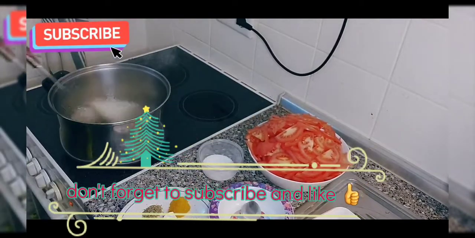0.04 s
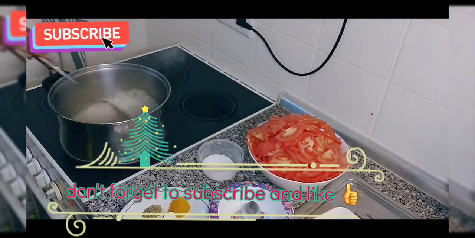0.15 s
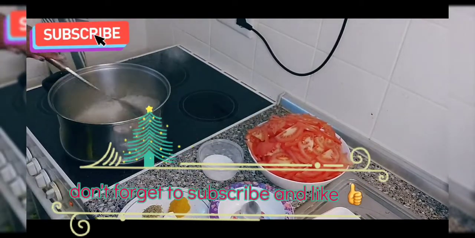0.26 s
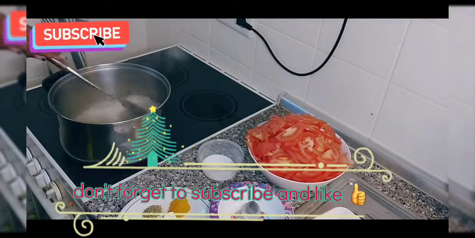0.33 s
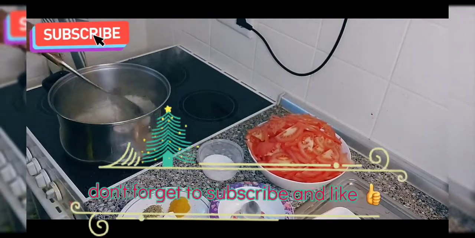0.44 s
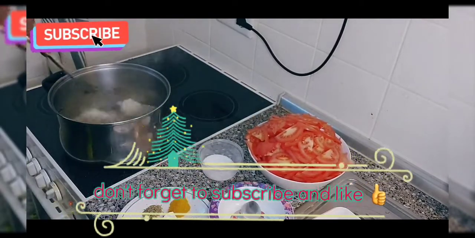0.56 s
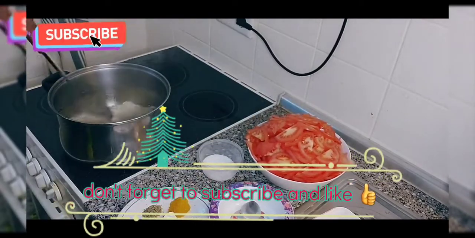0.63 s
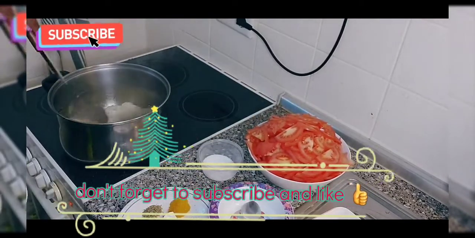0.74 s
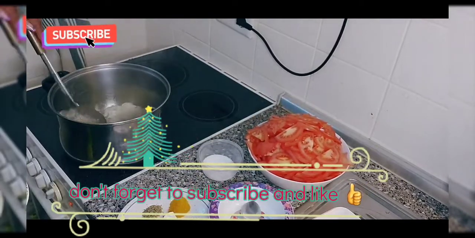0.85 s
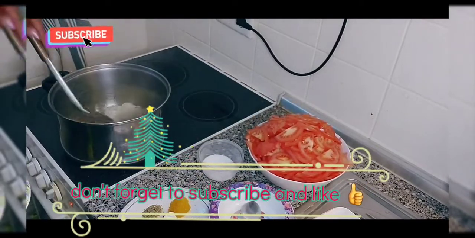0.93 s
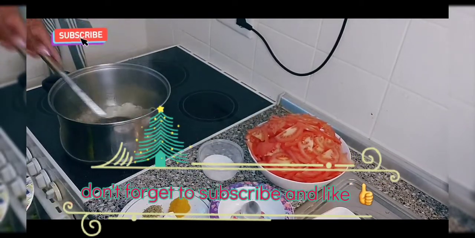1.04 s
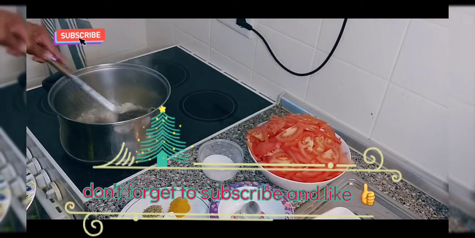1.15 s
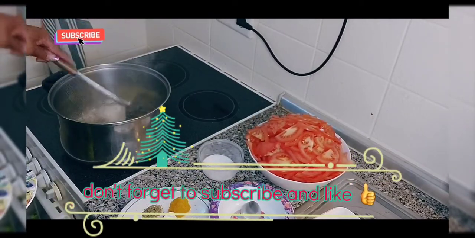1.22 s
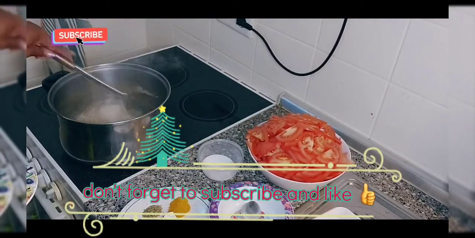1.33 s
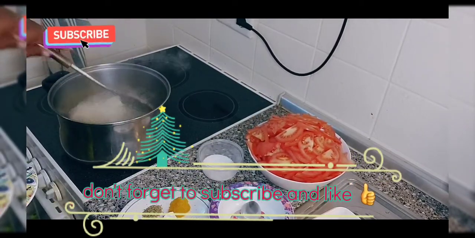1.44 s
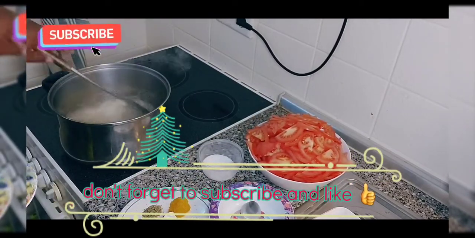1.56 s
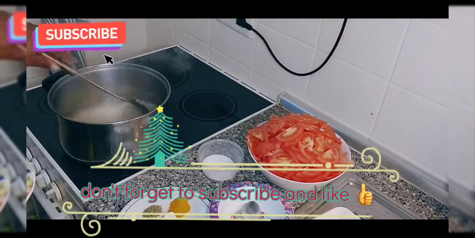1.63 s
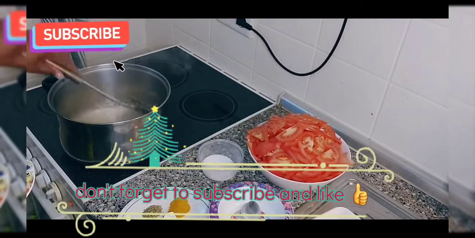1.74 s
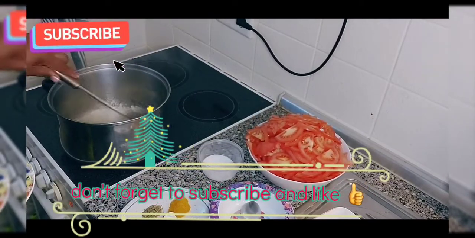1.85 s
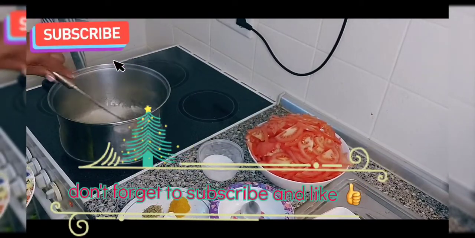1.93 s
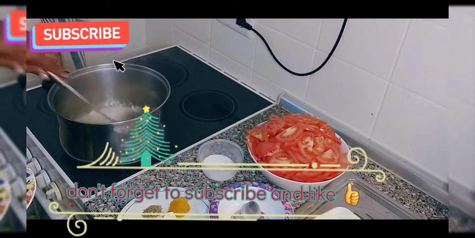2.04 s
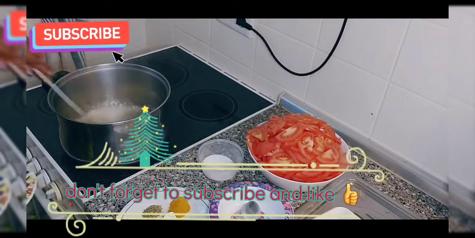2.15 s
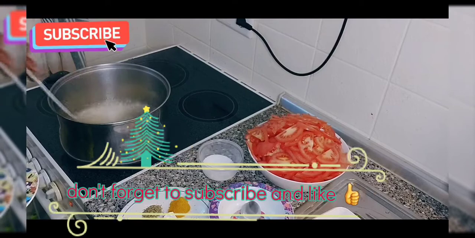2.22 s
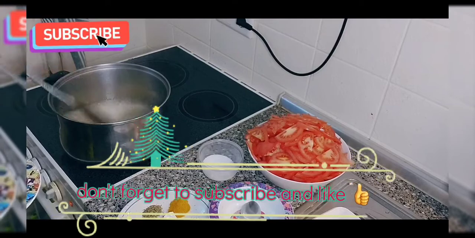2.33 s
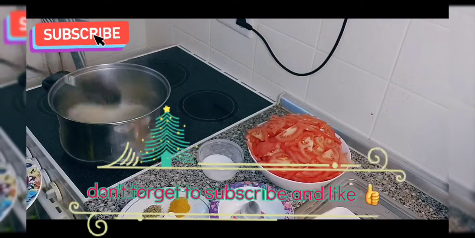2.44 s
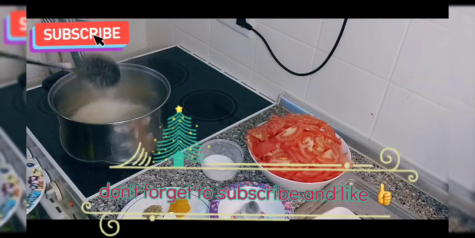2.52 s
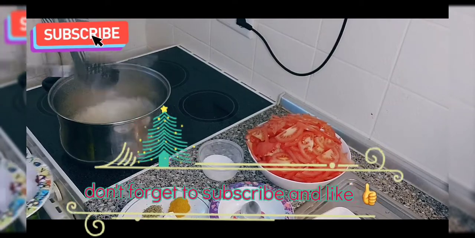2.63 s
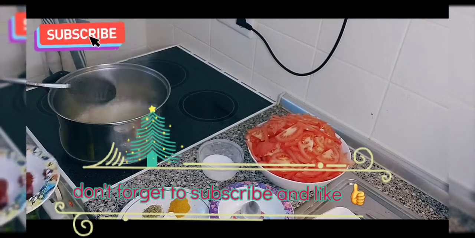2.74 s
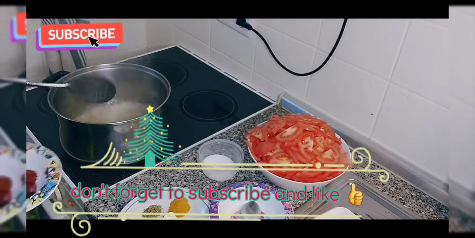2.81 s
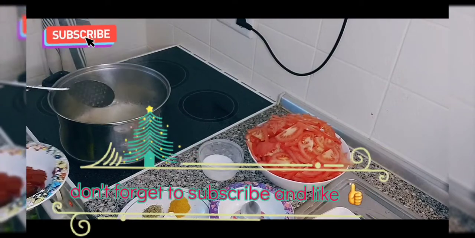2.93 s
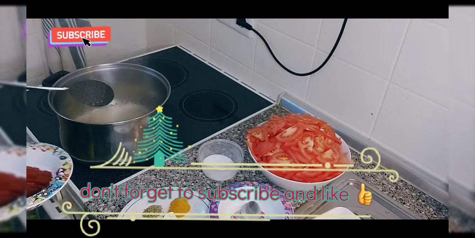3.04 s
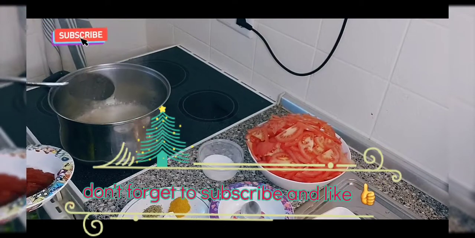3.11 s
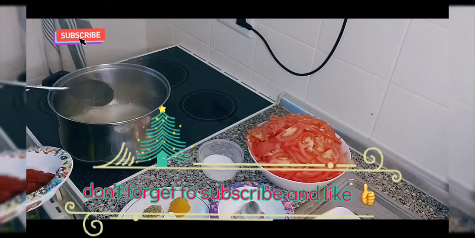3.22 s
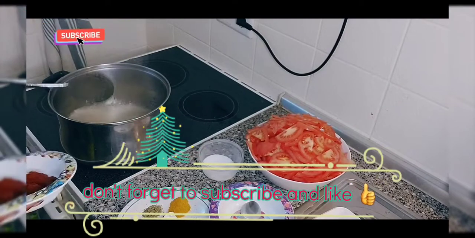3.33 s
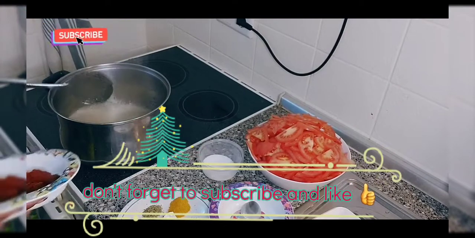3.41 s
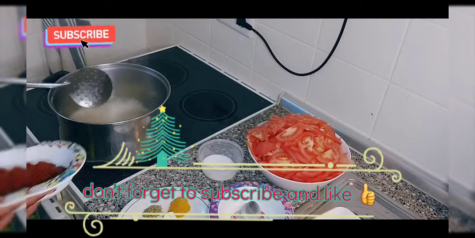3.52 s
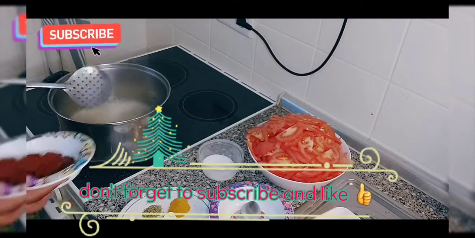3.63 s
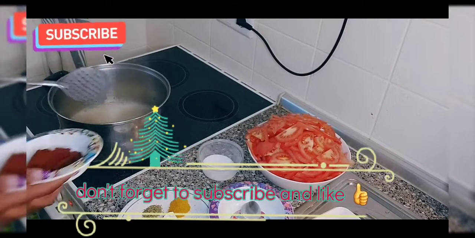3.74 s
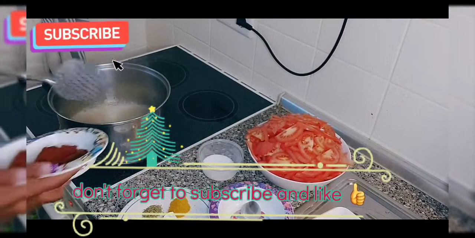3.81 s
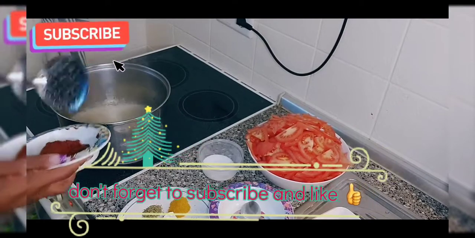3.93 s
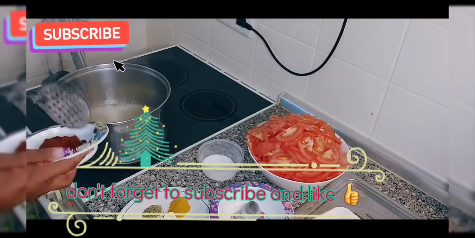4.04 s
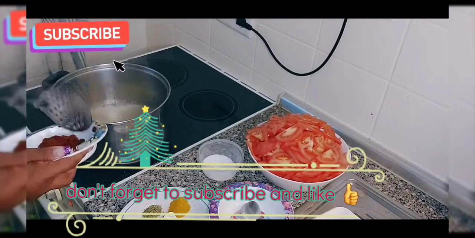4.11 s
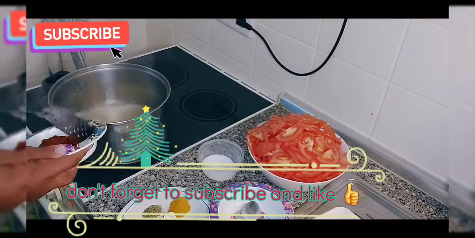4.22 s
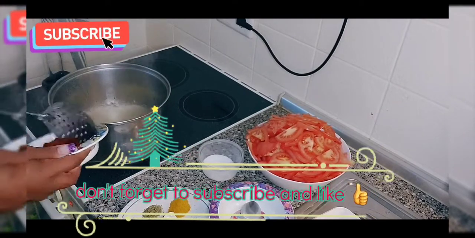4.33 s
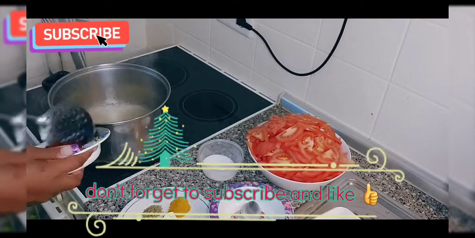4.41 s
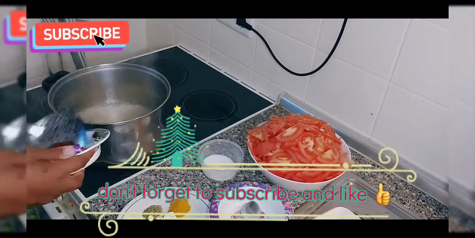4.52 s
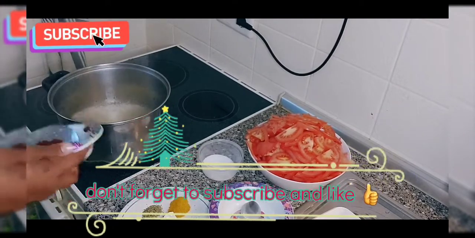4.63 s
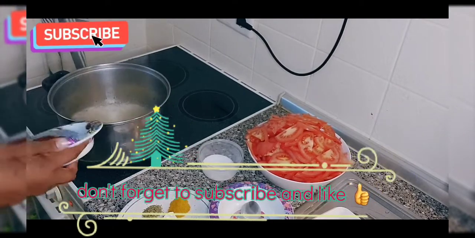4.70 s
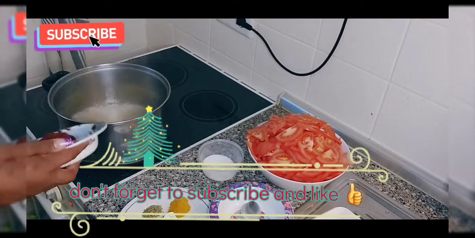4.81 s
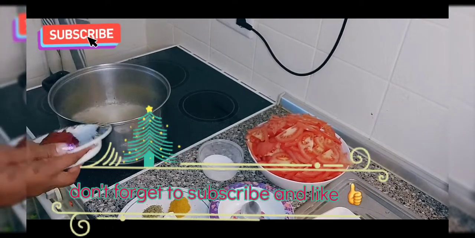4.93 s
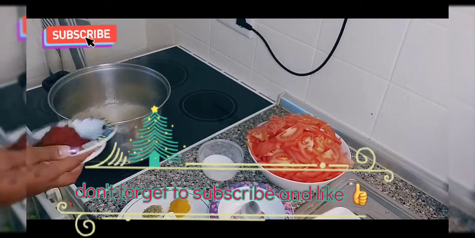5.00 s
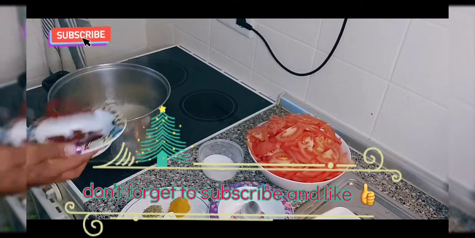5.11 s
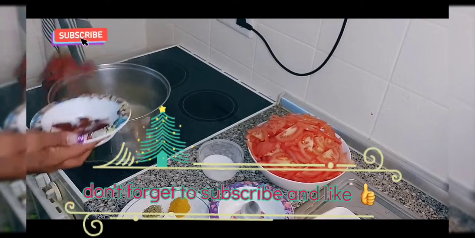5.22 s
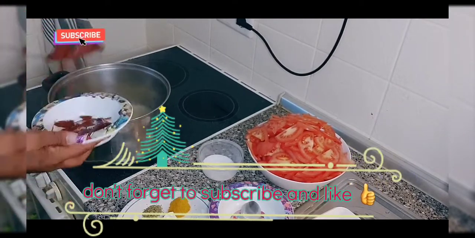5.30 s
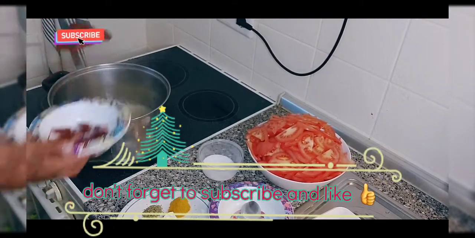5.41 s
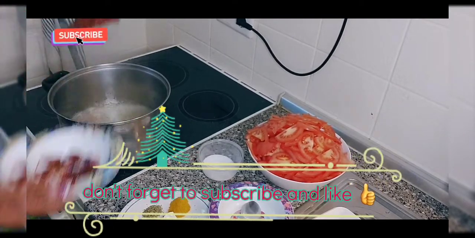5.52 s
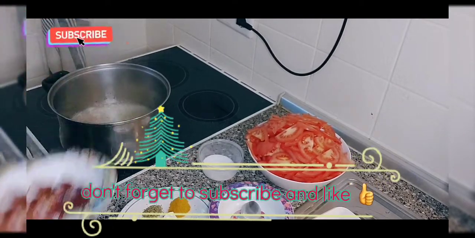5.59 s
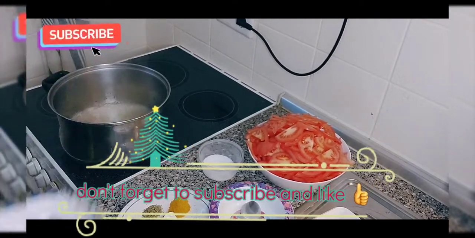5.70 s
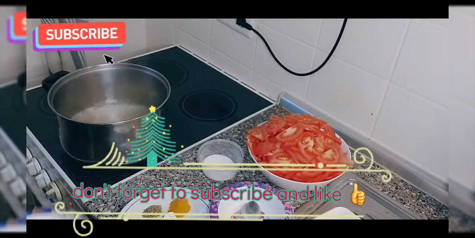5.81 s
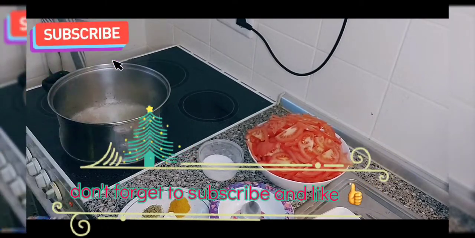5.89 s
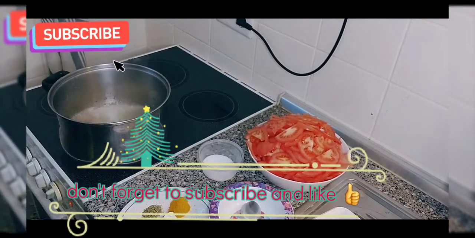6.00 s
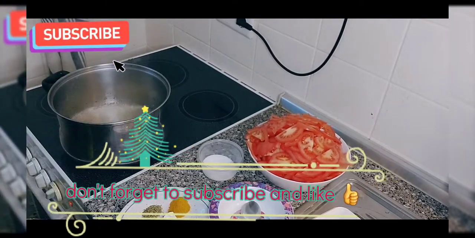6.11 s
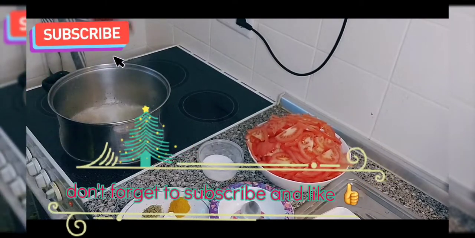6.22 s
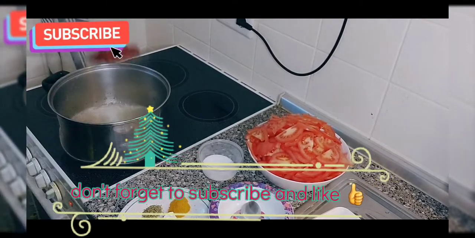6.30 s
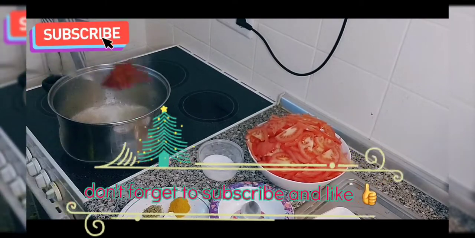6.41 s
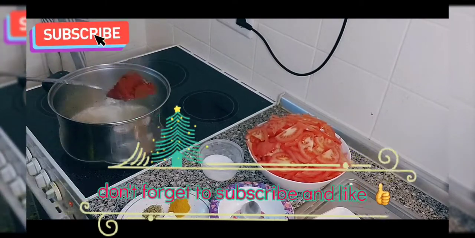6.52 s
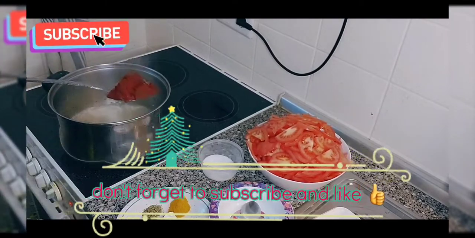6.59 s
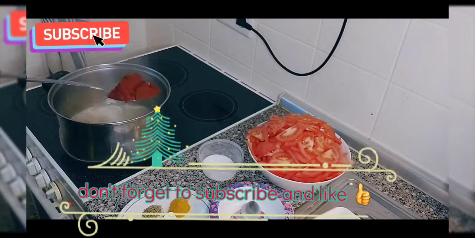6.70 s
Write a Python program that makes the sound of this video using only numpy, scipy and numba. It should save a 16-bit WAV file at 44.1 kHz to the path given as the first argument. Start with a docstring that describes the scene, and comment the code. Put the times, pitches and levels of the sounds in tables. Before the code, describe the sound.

Bright crackling frying in a steel pot, with scraping and small squeaks of a skimmer, five sharp clanging rim knocks, then quieter popping sizzle.

```python
"""A small tiled kitchen with a low hum, heard by a phone: onions fry in hot oil in a steel pot.
Decaying chirps make the larger bubbles, pops and spits; shaped noise makes fizz, spray and rumble.
A steel skimmer stirs and scrapes the bottom (noise bursts through resonances), then is knocked
five times on the rim: chattering noise and decaying modes of skimmer, pot and thudding hob."""
import sys
import numpy as np
from scipy import signal
from scipy.fft import rfft, irfft
from scipy.io import wavfile
from scipy.ndimage import uniform_filter1d
from numba import njit

SR = 44100
rng = np.random.default_rng(int(sys.argv[2]) if len(sys.argv) > 2 else 0)


def to_wav(s):
    """Save 16-bit WAV."""
    ch = np.atleast_2d(s).T  # columns
    pcm = np.round(np.clip(ch, -1, 1) * 32767)  # PCM
    wavfile.write(sys.argv[1], SR, pcm.astype(np.int16))


N = 297675  # samples


def undb(db):
    """Level: decibels become an amplitude ratio."""
    return 10 ** (np.asarray(db) / 20)


def unit(x):
    """Normalisation: scale to an rms of 1."""
    return x / np.sqrt(np.mean(x ** 2))


def curve(table):
    """Linear interpolation: the columns of a table as straight lines in time."""
    s, *columns = np.transpose(table)
    return [np.interp(np.arange(N) / SR, s, column) for column in columns]


def colour(x, shape):
    """Spectral shaping: filter by (Hz, dB) points joined over log frequency; the rms becomes 1."""
    hz, db = np.transpose(shape)
    f = np.fft.rfftfreq(len(x), 1 / SR) + 1
    gain_db = np.interp(np.log(f), np.log(hz), db, left=-90, right=-90)
    return unit(irfft(rfft(x) * undb(gain_db), len(x)))


def walk(rate):
    """Slow random modulation: levels clipped to +-2, drawn rate times a second, joined by ramps."""
    hold = int(SR / rate)
    levels = np.clip(rng.standard_normal(N // hold + 1), -2, 2)
    return uniform_filter1d(np.repeat(levels, hold), hold)[:N]


def crackle(share, spread_db):
    """Impulsive noise: a share of the samples are bursts of very uneven size."""
    active = rng.random(N) < share
    return rng.standard_normal(N) * active * undb(spread_db * rng.exponential(1, N))


def swells(rows, rise, fall):
    """Energy addition: rows (s, length s, dB, ..) rise, hold and die away; their powers add."""
    t, power = np.arange(N) / SR, 0
    for s, length, *db in rows:
        onset = np.clip((t - s) / rise, 0, 1)
        release = np.exp(-np.clip(t - s - length, 0, None) / fall)
        power = power + (undb(db)[:, None] * onset * release) ** 2
    return np.sqrt(power)


@njit
def grains(n, start, step, size, cycles, glide):
    """Bubble resonance: sines swell in one cycle and decay within some while their pitch rises."""
    out = np.zeros(n)
    for k in range(len(start)):
        w, phase, a = step[k], 0., size[k]  # w is in radians per sample
        fade, rise = np.exp(-w / cycles), 1 + glide * w / cycles
        for i in range(start[k], min(n, start[k] + int(6 * cycles / w))):
            phase += w
            out[i] += a * np.sin(phase) * min(phase / (2 * np.pi), 1.)
            a, w = a * fade, w * rise
    return out


def ring(x, hz, t60):
    """Resonance: one decaying mode, a complex pole driven by x."""
    pole = np.exp(2j * np.pi * hz / SR - np.log(1000) / (t60 * SR))
    return signal.lfilter([1], [1, -pole], x).imag


def struck(modes, t, rough):
    """Modal decay: modes start at any phase; loose contact makes each one flutter."""
    hz, db, t60 = np.transpose(modes)[:, :, None]
    flutter = uniform_filter1d(rng.standard_normal((len(hz), len(t))), size=200)
    swing = np.sin(2 * np.pi * (hz * t + rng.random(hz.shape)))
    swing = swing * (1 + rough * flutter / flutter.std())
    return np.sum(undb(db - 60 * t / t60) * swing, axis=0)


# The frying before its trim. Each row: time in seconds, level in dB of the fizz of tiny bubbles,
# of the larger bubbles, and of the spray hiss.
FRYING_LEVELS = [(0.0, -35.5, -38, -48.5), (0.47, -35, -39, -49.5), (0.73, -36.5, -37, -48),
                 (0.96, -33, -36.5, -46.5), (1.49, -35.5, -37.5, -46.5), (1.8, -35, -39.5, -49),
                 (2.1, -37, -39, -51), (2.54, -35.5, -39.5, -49), (2.8, -39.5, -38.5, -53),
                 (3.38, -40, -41, -54), (3.65, -39.5, -40, -57), (3.82, -44, -42.5, -55),
                 (4.08, -42.5, -42, -59.5), (4.53, -42, -44.5, -58), (4.74, -40.5, -44, -49.5),
                 (5.08, -42.5, -42.5, -59.5), (5.85, -44.5, -46.5, -61), (6.75, -42.5, -46, -61.5)]
# The frying flares up, before the trim. Each row: start in seconds, length in seconds,
# level in dB of the fizz, of the larger bubbles, and of the spray.
FRYING_FLARES = [(.6, 0.035, -53, -57, -47), (.69, 0.074, -50, -34.5, -53), (.755, 0.033, -35, -38, -44),
                 (1.15, .05, -45, -53, -48), (1.26, 0.036, -45, -53, -55), (1.85, 0.089, -40, -53, -63),
                 (2.24, 0.035, -39, -50, -60), (2.41, 0.066, -43, -43, -69), (2.59, .05, -38, -53, -57),
                 (4.09, 0.037, -55, -55, -51), (4.47, 0.021, -43, -60, -57), (4.56, 0.17, -43, -45.5, -57),
                 (4.68, 0.073, -50, -44, -57), (4.96, 0.022, -53, -43, -60), (5.29, 0.025, -45, -54, -70),
                 (5.35, 0.033, -61, -66, -63), (5.42, 0.048, -64, -43, -70), (5.69, 0.03, -37, -62, -63),
                 (5.83, 0.081, -62, -42.5, -68), (5.94, 0.02, -38.5, -62, -66),
                 (6.21, 0.046, -41.5, -60, -70), (6.42, 0.051, -56, -45, -59), (6.55, 0.024, -40, -60, -70)]
FLARE_RISE_S, FLARE_FALL_S = 0.0027, 0.0083
FRYING_TRIM_DB = -1.5


def frying():
    """Superposition: the bubble and droplet sounds add, and most of them share one random flurry."""
    fizz_gain, bubble_gain, spray_gain = undb(curve(FRYING_LEVELS))
    fizz_flare, bubble_flare, spray_flare = swells(FRYING_FLARES, FLARE_RISE_S, FLARE_FALL_S)
    flurry = walk(30)  # bubbles set each other off
    mix = fizz(np.hypot(fizz_gain, fizz_flare), flurry)
    mix = mix + larger_bubbles(np.hypot(bubble_gain, bubble_flare), flurry)
    mix = mix + spray_hiss(np.hypot(spray_gain, spray_flare), flurry)
    mix = mix + spits(fizz_gain) + pops()
    return undb(FRYING_TRIM_DB) * mix


# Spectrum of the tiny bubbles. Each row: frequency in Hz, relative density in dB per Hz.
FIZZ_SPECTRUM = [(3000, -4), (4500, -1), (5400, -2.5), (6600, 3), (7400, -1), (8400, -8), (9500, -15.5),
                 (11000, -22)]


def fizz(gain, flurry):
    """Dense random impulses: bursts of tiny bubbles merge into a flickering band of noise."""
    flicker_db = 1.44 * flurry + 1.3 * walk(60) + 0.62 * walk(10)
    return colour(crackle(0.3, 1.2), FIZZ_SPECTRUM) * gain * undb(flicker_db)


BUBBLE_HZ, BUBBLE_DRIFT = 3200, 0.078  # typical starting pitch, and the share by which it wanders
BUBBLE_COUNT, BUBBLE_SPREAD = 20000, 0.4135  # spread of pitch, natural log


def larger_bubbles(gain, flurry):
    """Bubble resonance: larger bubbles chirp around a drifting size."""
    when, chance = rng.random((BUBBLE_COUNT, 2)).T
    start = (when * N).astype(np.int64)
    spread = BUBBLE_SPREAD * rng.standard_normal(len(start))
    hz = np.clip(BUBBLE_HZ * np.exp(BUBBLE_DRIFT * walk(8)[start] + spread), 900, 9000)
    size = undb(np.minimum(-2.6 * np.log(1 - chance), 12))  # few are large
    chirps = grains(N, start, 2 * np.pi * hz / SR, size, 12.7, 0.052)
    return unit(chirps) * gain * undb(0.63 * flurry + 0.3 * walk(20))


# Spectrum of the spray. Each row: frequency in Hz, relative density in dB per Hz.
SPRAY_SPECTRUM = [(8000, -38), (9500, -2), (11800, 1.5), (13500, -2), (16000, -7)]


def spray_hiss(gain, flurry):
    """Random impulses in the high treble: droplets hiss on the hot steel."""
    flicker_db = 0.63 * flurry + 0.9 * walk(60) + 1.9 * walk(12)
    return colour(crackle(0.23, 2.1), SPRAY_SPECTRUM) * gain * undb(flicker_db)


SPITS_PER_S, SPIT_HZ = 25, 5500  # mean rate, middle of the starting pitches
SPIT_DB = 13  # strongest spit over the fizz gain


def spits(fizz_gain):
    """Transient resonance: single drops of water burst in the oil with a short bright tick."""
    when, pitch, weakness = rng.random((int(SPITS_PER_S * N / SR), 3)).T
    start = (when * N).astype(np.int64)
    hz = SPIT_HZ * np.exp(0.7 * (pitch - 0.5))
    size = fizz_gain[start] * undb(SPIT_DB - 8 * weakness)
    return grains(N, start, 2 * np.pi * hz / SR, size, 25., 0.04)


# The skimmer dragged over the bottom. Each row: start in seconds, length in seconds, level in dB
# of the drag, of the hollow low tone, and of the squeal of the pot wall.
STROKES = [(0, 0.064, -56, -73, -53), (.157, 0.028, -48, -65, -33), (.22, 0.15, -42.5, -54, -52),
           (.31, 0.026, -50, -57, -41.5), (.37, 0.11, -48, -52, -51), (.55, 0.11, -48.5, -58, -53),
           (.685, 0.068, -45.5, -59, -45), (.77, 0.23, -43.5, -52.5, -53), (.82, 0.028, -45, -58, -35.5),
           (.89, 0.052, -60, -60, -34), (1.13, 0.026, -45.5, -71, -42), (1.35, .1, -46.5, -73, -50),
           (1.47, 0.13, -47.5, -42.5, -42), (1.5, 0.018, -58, -55, -40), (1.555, 0.024, -55, -58, -40.5),
           (1.63, 0.034, -45, -55, -45), (1.76, 0.033, -55, -58, -55), (2.37, 0.06, -44.5, -51, -43),
           (2.6, 0.11, -73, -76, -67)]
STROKE_RISE_S, STROKE_FALL_S = 0.003, 0.029
# Between strokes. The one row: level in dB of the drag, of the hollow tone, and of the squeal.
REST_LEVELS = (-53.5, -88, -55.5)
LIFTED_S = 2.8  # the skimmer leaves the onions
# Resonances of the pot: five of its air, then two of its squealing wall.
# Each row: frequency in Hz, bandwidth in Hz, relative level in dB.
POT_RESONANCES = [(300, 170, -38), (495, 20, -29), (616, 40, 18.5), (785, 210, 19.5), (1490, 540, -20),
                  (1135, 27, 6.5), (1300, 120, 0)]


def stirring():
    """Stick-slip excitation: the skimmer drives the pot's air and at times makes its wall squeal."""
    strokes = STROKES + [(0.0022, LIFTED_S, *REST_LEVELS)]
    drag_gain, hollow_gain, squeal_gain = swells(strokes, STROKE_RISE_S, STROKE_FALL_S)
    slip = crackle(0.3, 1.5) * undb(1.3 * walk(40))
    tones = []
    for hz, width, db in POT_RESONANCES:
        t60 = np.log(1000) / np.pi / width
        tones.append(undb(db) * unit(ring(slip, hz, t60)))
    drag = drag_gain * unit(sum(tones[:5]))
    hollow = hollow_gain * unit(tones[1])
    squeal = squeal_gain * unit(sum(tones[5:]))
    return drag + hollow + squeal


# The pot shaking on the hob. Each row: time in seconds, level in dB.
RUMBLE_LEVELS = [(0, -56), (.22, -74), (.42, -56), (.58, -49.5), (.7, -65), (.82, -51), (1.0, -50),
                 (1.1, -60), (1.3, -70), (1.58, -62), (1.7, -55), (1.9, -55), (2.0, -64), (2.3, -62),
                 (2.85, -62), (3.9, -51.5), (4.3, -60.5), (4.57, -63), (4.9, -59.5), (5.38, -67),
                 (5.6, -55), (6.26, -63), (6.35, -68), (6.47, -72.5), (6.75, -67)]
# Spectrum of the shaking. Each row: frequency in Hz, relative density in dB per Hz.
RUMBLE_SPECTRUM = [(28, -35), (58, 2), (80, -4.5), (100, -6), (135, -5), (190, -31.5), (260, -9)]


def rumble():
    """Structure-borne sound: the boiling, stirred pot shakes the hob, as low noise."""
    return colour(rng.standard_normal(N), RUMBLE_SPECTRUM) * undb(curve(RUMBLE_LEVELS)[0])


# Spectrum of the kitchen. Each row: frequency in Hz, relative density in dB per Hz.
KITCHEN_SPECTRUM = [(110, -38), (190, -19.5), (340, -7), (570, -4), (760, -5.5), (960, -9.5), (1120, -0.5),
                    (1300, -9.5), (2500, -11.5)]
KITCHEN_DB = -49.5  # level about which the hum wavers


def kitchen_hum():
    """Stationary background noise: a low band whose level wavers slightly."""
    waver_db = 1.2 * walk(3) + 1.5 * walk(15)
    return colour(rng.standard_normal(N), KITCHEN_SPECTRUM) * undb(KITCHEN_DB + waver_db)


ROOM_T60_S, ROOM_DB = 0.4, -6  # decay of the noise behind the tail; tail relative to the direct sound
TAIL_S, FIRST_ECHO_S = 0.4, 0.003


def room(x):
    """Reverberation: tiled walls return a short diffuse tail, without bass and even in colour."""
    t = np.arange(int(TAIL_S * SR)) / SR
    late = t > FIRST_ECHO_S
    spectrum = rfft(rng.standard_normal(len(t)) * 10 ** (-3 * t / ROOM_T60_S) * late)
    tail = irfft(spectrum / np.abs(spectrum), len(t))  # flat magnitude: even colour
    tail = tail * late * np.clip((TAIL_S - t) / 0.2, 0, 1)
    tail = signal.sosfilt(signal.butter(2, 180, "high", fs=SR, output="sos"), tail)
    tail = tail / np.sqrt(np.sum(tail ** 2))
    return x + undb(ROOM_DB) * signal.fftconvolve(x, tail)[:N]


# Big bubbles bursting, before the frying trim.
# Each row: start in seconds, level in dB (4 dB is taken off), starting pitch in Hz.
BIG_BUBBLES = [(0.3958, -21, 2360), (0.5288, -20, 2050), (0.55, -26, 1880), (0.575, -36, 2120),
               (0.756, -12, 6020), (0.8461, -13, 6400), (0.9394, -24, 4180), (1.0024, -29, 6850),
               (1.1383, -17.5, 6610), (1.7277, -21, 7440), (1.9553, -19, 2820), (1.969, -26, 6300),
               (2.099, -24, 2170), (2.2504, -22.5, 3420), (2.2949, -20.5, 2480), (2.417, -17, 5700),
               (2.5893, -18, 3470), (3.068, -19, 6500), (3.3627, -22.5, 2360), (3.4485, -19, 3000),
               (3.461, -25, 2900), (4.025, -18.5, 5400), (4.0955, -26.5, 2320), (4.1897, -23, 6600),
               (4.189, -27, 1870), (4.214, -26, 2470), (4.2884, -26, 3080), (4.558, -24.5, 2860),
               (4.565, -24, 4100), (4.588, -33, 1185), (4.593, -24.5, 2150), (4.608, -31, 2200),
               (4.631, -30, 3200), (4.6544, -19.5, 3200), (4.6844, -25, 3240), (4.9595, -23, 3260),
               (5.028, -25.5, 2800), (5.0873, -24, 3050), (5.104, -28, 3180), (5.1933, -26, 3280),
               (5.2147, -24, 5360), (5.293, -30, 2920), (5.299, -27, 6030), (5.3642, -26, 5500),
               (5.431, -25, 2630), (5.4694, -26, 3380), (5.5224, -26, 3430), (5.5803, -23, 2740),
               (5.74, -27.5, 3420), (5.8222, -24, 2560), (5.8343, -21.5, 3120), (5.8647, -27, 3230),
               (6.0166, -25, 4060), (6.11, -25, 3900), (6.1905, -24.5, 3060), (6.215, -26, 6700),
               (6.4157, -23.5, 6060), (6.4372, -27, 2400), (6.4607, -26.5, 4210), (6.5167, -25, 3460),
               (6.539, -30, 4100), (6.6842, -24.5, 3480), (6.7402, -19, 2980)]


def pops(count=14, flurry_ms=12):
    """Bubble resonance in clusters: one big bubble, then smaller ones of nearby pitch."""
    s, db, hz = np.transpose(BIG_BUBBLES)[:, :, None]
    follower = np.arange(count) > 0
    late = rng.exponential(1, (len(s), count)) * follower
    pitch = hz * np.exp(0.12 * rng.standard_normal(late.shape) * follower)
    start = ((s + late * flurry_ms / 1000) * SR).astype(np.int64)
    size = undb(db - 4 - (1 + 2.7 * late) * follower)  # later ones are weaker
    return grains(N, start.ravel(), 2 * np.pi * pitch.ravel() / SR, size.ravel(), 27.0, 0.04)


# Blows on the rim. Each row: start in seconds, overall level in dB, then relative levels in dB of
# the thud, the pot body, the rim tone, the skimmer ringing free and the skimmer's treble,
# and last the chatter's decay time in ms.
KNOCKS = [(2.953, -8, -17, 3.5, -2.5, -4, 0, 6.4), (3.279, -12, -16.5, 5, -9, -10, -1, 6.1),
          (3.516, -14.5, -17.5, 4.5, -7.5, -8, -2.5, 6), (3.623, -7, -18, 3.5, -19, -2.5, -7.5, 4.8),
          (3.731, -7.5, -19.5, 3, -25, 4, -12, 9.1)]
KNOCK_RISE_S = 0.0023


def knocks():
    """Impact excitation: each blow chatters for some ms and rings skimmer, pot and hob."""
    out, t = np.zeros(N + SR), np.arange(SR // 2) / SR
    rise = np.clip(t / KNOCK_RISE_S, 0, 1)
    for s, db, thud_db, pot_db, rim_db, free_db, treble_db, chatter_ms in KNOCKS:
        blow = undb(-13.5) * skimmer_ring(t, free_db, treble_db)
        blow = blow + undb(pot_db - 21.5) * pot_ring(t, rim_db)
        blow = blow + undb(-13.0) * chatter(t, chatter_ms)
        blow = blow + undb(thud_db) * hob_thud(t)
        i = int(s * SR)
        out[i:i + len(t)] += undb(db) * rise * blow
    return out[:N]


# Modes of the skimmer. Each row: frequency in Hz, relative level in dB, t60 in seconds.
SKIMMER_MODES = [(2560, -18, 0.41), (2980, -12.5, 0.32), (3080, -14, 0.081), (3420, 0, 0.12),
                 (3420, -7, 0.11), (3790, -11, 0.12), (3850, -1, 0.078), (4200, -8.5, 0.12),
                 (5400, -22, 0.51), (5270, -22, .1), (6100, 1, 0.11), (5600, -17, 0.17), (6610, 0.5, 0.073),
                 (6580, -1.5, 0.11), (6500, -10, 0.11), (7140, -5, 0.14), (7460, 2, 0.05)]
# The handle tone that the grip damps.
# The one row: frequency in Hz, relative level in dB, t60 in seconds.
HANDLE_MODE = (2304, -13, 0.36)


def skimmer_ring(t, free_db, treble_db):
    """Modal vibration: the steel rings, its modes above 5 kHz set apart as treble."""
    modes = [(hz, db + treble_db * (hz > 5000), t60) for hz, db, t60 in SKIMMER_MODES]
    return struck(modes, t, rough=0.65) + undb(free_db) * struck([HANDLE_MODE], t, rough=0.08)


# Modes of the pot body. Each row: frequency in Hz, relative level in dB, t60 in seconds.
POT_MODES = [(225.6, -17, 0.46), (251, -16, 0.35), (272.4, -15, .35), (309.7, -14.5, 0.31),
             (349, -15.5, 0.37), (374, -21.5, 0.33), (494, -14.5, 0.083), (553, -7.5, 0.21),
             (587, -5.5, 0.1), (644.5, -10.5, 0.37), (662, -0.5, 0.064), (783, -4, 0.049),
             (854.4, -13, 0.19), (886, -10.5, 0.19), (1115, -15.5, 0.34), (1210, -12.5, 0.14)]
# The long tone of the rim, which some blows find better. The one row: frequency in Hz, t60 in seconds.
RIM_MODE = (575, 0.5)
SPOT_DB = 2  # scatter of the mode levels: each blow lands elsewhere


def pot_ring(t, rim_db):
    """Modal participation: the spot that is struck sets how strongly each mode of the pot rings."""
    spot_db = SPOT_DB * rng.standard_normal(len(POT_MODES))
    modes = [(hz, db + spot, t60) for (hz, db, t60), spot in zip(POT_MODES, spot_db)]
    rim_hz, rim_t60 = RIM_MODE
    return struck(modes + [(rim_hz, rim_db, rim_t60)], t, rough=0.55)


# Spectrum of the chatter. Each row: frequency in Hz, relative density in dB per Hz.
CHATTER_SPECTRUM = [(150, -31), (600, -4), (1500, -4.5), (3600, -7), (5000, 0), (6500, 11.5), (7600, 3),
                    (9500, -8.5), (16000, -19)]


def chatter(t, decay_ms):
    """Contact noise: shaped noise with a fast decay and a weaker, slower one."""
    envelope = np.exp(-t * 1000 / decay_ms) + 0.25 * np.exp(-t / 0.049)
    return colour(rng.standard_normal(len(t)), CHATTER_SPECTRUM) * envelope


# Modes of the hob. Each row: frequency in Hz, relative level in dB at the swing's peak, t60 in seconds.
HOB_MODES = [(61.9, -10.5, 0.58), (79.2, -4, 0.32), (115.8, -14.5, 0.5), (139.2, -7.5, 0.27),
             (158, -11, 0.25), (205, -16, 0.23)]
THUD_LATE_S = 0.0207  # the hob's swing peaks this long after the blow


def hob_thud(t):
    """Inertia: the heavy hob swings up slowly, and its modes fall in step at the peak."""
    late = t - THUD_LATE_S
    swing = np.clip(t / THUD_LATE_S, 0, 1)
    modes = [undb(db - 60 * late / t60) * np.sin(2 * np.pi * hz * late) for hz, db, t60 in HOB_MODES]
    return swing * sum(modes)


def scene():
    """Superposition: frying and knocks pass through the room; the other sounds stay dry."""
    return (room(frying()) + stirring() + rumble() + kitchen_hum() + room(knocks()))[None]


# Response of the phone's port. Each row: frequency in Hz, gain in dB.
PORT_RESPONSE = [(20, -0.5), (7400, 1), (8400, -6.5), (9500, -13.5), (11500, -2), (22050, 6.5)]
LOW_HZ, TOP_HZ = 53, 15830  # cutoffs of the phone


def record(dry):
    """Linear filtering: the phone's port dips near 9.5 kHz; it cuts the deep bass and the top."""
    hz = [0] + [f for f, _ in PORT_RESPONSE[:-1]] + [SR / 2]
    gain = undb([0] + [db for _, db in PORT_RESPONSE])
    port = signal.firwin2(255, hz, gain, fs=SR)
    through_port = signal.fftconvolve(dry, port[None], "same")
    thin = signal.sosfilt(signal.butter(4, LOW_HZ, "high", fs=SR, output="sos"), through_port)
    return signal.sosfilt(signal.ellip(10, 0.2, 70, TOP_HZ, fs=SR, output="sos"), thin)


dry = scene()
out = record(dry)
to_wav(out)
```